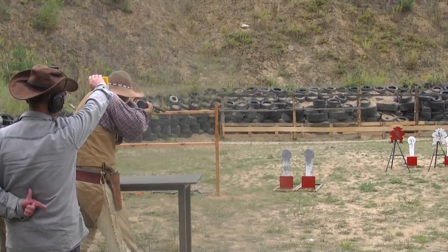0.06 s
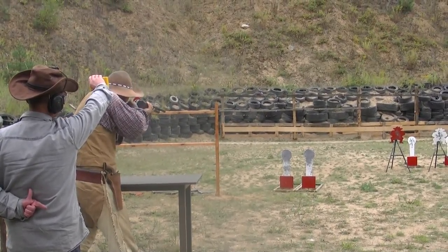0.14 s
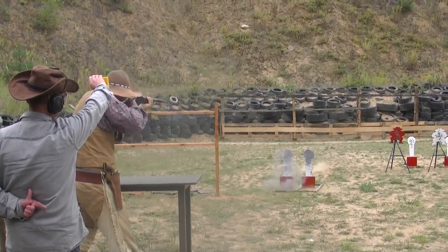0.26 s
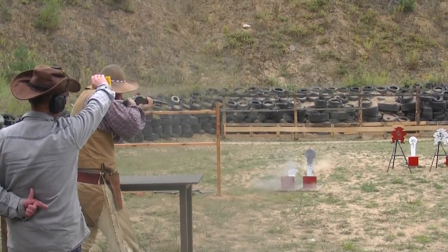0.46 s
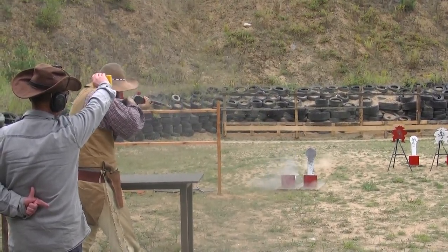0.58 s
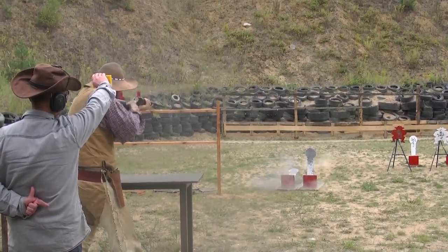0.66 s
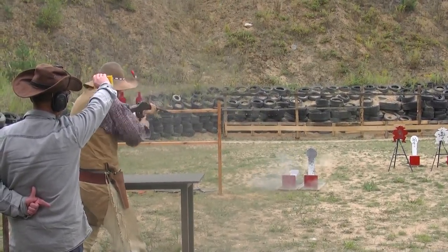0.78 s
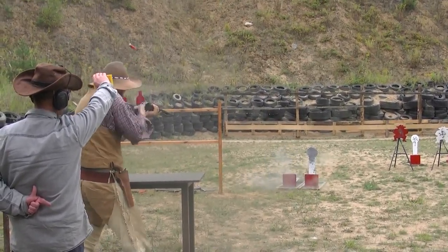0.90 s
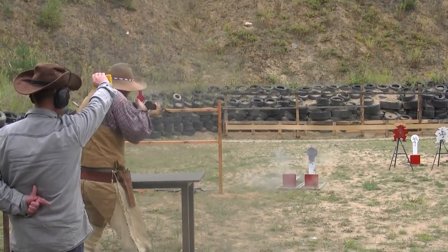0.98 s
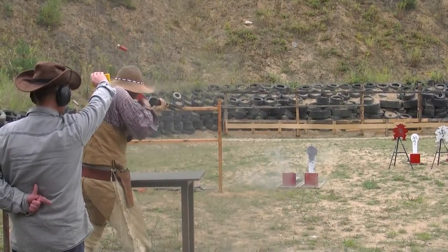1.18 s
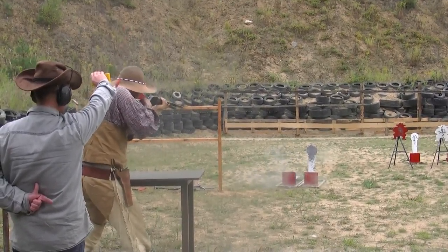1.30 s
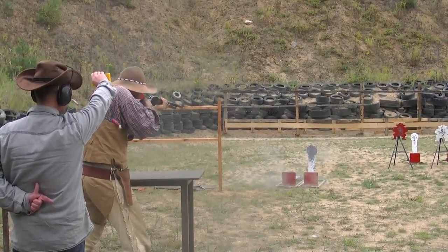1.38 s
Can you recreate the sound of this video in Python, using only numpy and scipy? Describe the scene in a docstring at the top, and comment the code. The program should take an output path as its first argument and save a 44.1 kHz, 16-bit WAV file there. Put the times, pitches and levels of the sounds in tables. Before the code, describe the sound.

A single loud rifle shot, heard from just behind the shooter, echoes and rolls across an outdoor range. The lever then slides open with hollow knocks and clanks shut, followed by a few light knocks and a small click.

```python
"""An outdoor range, just behind the shooter: one rifle shot, while an earlier one dies away.
Hands tap the stock, the hammer falls and the muzzle blast overloads the microphone.
The tyre wall and the earth bank reflect the blast, and the range reverberates in a long roll.
The lever slides open with hollow knocks and clanks shut, each impact exciting modes of the steel;
a few more knocks follow, and a latch clicks."""
import sys
import numpy as np
from scipy import signal
from scipy.fft import rfft, irfft
from scipy.io import wavfile
from scipy.ndimage import uniform_filter1d

SR = 44100
rng = np.random.default_rng(int(sys.argv[2]) if len(sys.argv) > 2 else 0)


def transcribe(signal):
    """Save signal, clipped to [-1, 1], as a 16-bit WAV file at the path in sys.argv[1]."""
    frames = np.atleast_2d(signal).T
    limited = np.clip(frames, -1, 1)
    pcm = np.round(limited * 32767).astype(np.int16)
    wavfile.write(sys.argv[1], SR, pcm)


N = 63945
T, HZ = np.arange(N) / SR, np.fft.rfftfreq(N, 1 / SR)
RIFLE_LOW_HZ = 930  # the rifle radiates little below this

# likeness of the noise at the two microphones (frequency [Hz], correlation [ratio])
COHERENCE = [(40, -0.37), (150, 1), (600, 0.55), (1200, 0.46), (2200, 0.014), (4200, -0.014),
             (8000, -0.043), (13000, 0.35)]
# noise spectra (frequency [Hz], relative spectral density [dB])
EARLIER_SPECTRUM = [(60, -28), (400, -6), (750, 0), (1400, -6.5), (2100, -2), (5000, -16.5), (9000, -23),
                    (15500, -47)]
AIR_SPECTRUM = [(25, -44.5), (284, -11), (1200, -10), (15500, -28)]
TAP_SPECTRUM = [(90, -48), (270, -11.5), (750, 3.5), (2200, 0.5), (4500, -15), (16000, -33.5)]
SNAP_SPECTRUM = [(300, -19), (1000, 0.5), (2000, -1.5), (6000, -5.5), (8000, -1), (11300, 1), (13000, -12),
                 (16000, -20.5)]
BLAST_SPECTRUM = [(15, -50.5), (25, -17), (173, -19.5), (227, -12), (281, -10), (703, -2), (1400, -2),
                  (1750, -4), (4380, -16), (9050, -20), (15500, -26.5)]
ZING_SPECTRUM = [(9300, -43.5), (9420, -5), (9650, -15), (10150, -12), (10400, -47)]
ROLL_SPECTRUM = [(35, -66), (188, -14), (417, -12), (577, -3), (653, -10), (903, -3), (1350, -13.5),
                 (1730, -8), (5860, -20.5), (9650, -22), (15500, -33.5)]
ECHO_SPECTRUM = [(40, -53), (150, -10), (300, -15), (700, 0.5), (1100, -2.5), (3700, -8.5), (7000, -16),
                 (10400, -11.5), (15500, -38)]
SCRAPE_SPECTRUM = [(450, -2.5), (750, 7.5), (1200, 0.5), (2100, 3.5), (3600, -2.5), (6000, -18.5),
                   (8300, -7.5), (13000, -16.5), (16000, -29)]
# time each band takes to fall by 60 dB (frequency [Hz], t60 [s])
EARLIER_DECAY = [(200, 0.35), (2000, 1), (10000, 0.33)]
BLAST_DECAY = [(60, 0.049), (250, 0.52), (1200, 0.35), (5000, .17), (14000, 0.18)]
ROLL_DECAY = [(60, 0.8), (200, 0.77), (2000, 1.29), (6000, 0.77), (14000, 0.33)]
SCRAPE_DECAY = [(1500, 0.23), (10000, 0.18)]
# normal modes of the rifle's parts (frequency [Hz], relative level [dB], t60 [s])
RECEIVER_MODES = [(1349, -13.5, .125), (1407, 7, 0.044), (1534, -17, 0.068), (1840, -12, 0.16),
                  (2096, -10.5, 0.08)]
SMALL_PART_MODES = [(4450, -6, 0.076), (7140, -3, 0.065), (10070, 7.5, 0.02), (11500, -3.5, .05)]
CAVITY_MODES = [(693, -5, 0.19), (724.6, 3.5, 0.14), (784, -7, 0.2), (820, -10.5, 0.19), (945, -5, 0.11),
                (1376, -18, 0.33), (1730, -13, 0.35), (1890, -12.5, 0.15), (2220, -14, 0.15),
                (2540, -20, 0.17), (3620, -20, 0.16)]
STOCK_MODES = [(254, -42, 0.11)]
LATCH_MODES = [(1338, -35, 0.076), (1690, -39, 0.051)]
# taps and scuffs of handling (time [s], level [dB], t60 [s])
HAND_TAPS = [(0.1944, -29.5, 0.19), (.217, -30, 0.14), (.983, -31.5, 0.42)]
# impacts of hammer and lever (time [s], snap level [dB], receiver level [dB], snap t60 [s])
STEEL_IMPACTS = [(0.2333, -19, -11, 0.027), (0.6007, -34, -36, .05), (0.729, -14, -16.5, 0.06),
                 (.747, -22, -41, 0.09), (0.76, -26.5, -28, 0.11), (0.772, -14, -51.5, 0.046),
                 (0.7896, -19.5, -41.5, 0.068), (.883, -34.5, -57, 0.16), (.917, -33.5, -55, 0.089),
                 (0.9237, -19.5, -37, 0.13), (0.932, -43, -24, .04), (0.9474, -18, -39, 0.046),
                 (0.951, -16, -18, 0.066), (.968, -17, -39, 0.076), (0.9726, -13.5, -11.5, 0.04),
                 (1.003, -47, -24.5, .06)]
# returns from the tyre wall and the bank (time [s], level [dB], t60 [s])
REFLECTIONS = [(.344, -13, 0.23), (0.356, -5.5, 0.032), (0.387, -18.5, 0.085)]
# knocks inside the action (time [s], ring level [dB], scrape level [dB])
CAVITY_KNOCKS = [(.601, -26.5, -25), (.678, -21.5, -27.5), (.712, -25.5, -24.5), (.729, -24.5, -25),
                 (1.005, -28.5, -51), (1.070, -40.5, -56), (1.142, -37, -61), (1.159, -25.5, -30)]


def amp(db):
    """The decibel scale: level to amplitude ratio."""
    return 10 ** (np.asarray(db) / 20)


def read(points, hz):
    """Interpolation of a table on a log-frequency axis."""
    frequencies, values = np.transpose(points)
    return np.interp(np.log(hz + 1), np.log(frequencies + 1), values)


def add(mix, start_s, sound):
    """Superposition of a delayed sound on the mix."""
    start = max(round(start_s * SR), 0)
    mix[:, start:] += sound[:, :N - start]


def rise(seconds):
    """Linear onset to full amplitude."""
    return np.minimum(T / seconds, 1)


def fade(t, t60):
    """Exponential damping: 60 dB in t60 seconds."""
    return np.exp(-np.log(1000) * t / t60)


def noise(spectrum, ripple=1):
    """Partial coherence: coloured noise of unit level, partly alike in both microphones."""
    mid, side = rfft(rng.standard_normal((2, N)))
    correlation = np.clip(read(COHERENCE, HZ), -.99, .99)
    mid, side = mid * np.sqrt(1 + correlation), side * np.sqrt(1 - correlation)
    x = irfft(np.array([mid + side, mid - side]) * amp(read(spectrum, HZ)) * ripple, N)
    return x / x.std()


def die_away(x, t60s, hold_s=0):
    """Frequency-dependent damping: after a hold, each band decays at its own rate."""
    hz, t, bands = signal.stft(x, SR, nperseg=512)
    bands = bands * fade(np.maximum(t - hold_s, 0), read(t60s, hz)[:, None])
    return signal.istft(bands, SR, nperseg=512)[1][:, :N]


def ring(modes, uneven_db=0):
    """Free vibration: damped modes reach the two microphones slightly out of phase."""
    out = np.zeros((2, N))
    for hz, db, t60 in modes:
        lead_rad = 0.21 * rng.choice([-1, 1]) * np.array([[1], [-1]])
        strength = amp(db + uneven_db * rng.uniform(-1.2, 1))
        out += strength * fade(T, t60) * np.sin(2 * np.pi * hz * T + lead_rad)
    return out


def unevenness(depth_db, size):
    """Interference of many reflections or resonances, modelled as a smooth random gain."""
    x = uniform_filter1d(uniform_filter1d(rng.standard_normal(N), size), size)
    gain = amp(depth_db * x / x.std())
    return gain / np.sqrt(np.mean(gain ** 2))


def low_cut(x, hz):
    """Radiation efficiency: small objects give out little bass."""
    return signal.sosfilt(signal.butter(2, hz, btype="high", fs=SR, output="sos"), x)


def outdoors(x, wet_db, t60, top_hz=6930):
    """Diffuse scattering from the ground and fences adds a dull tail."""
    tail = rng.standard_normal((2, N)) * fade(T, t60) * rise(0.013)
    tail = signal.lfilter(*signal.butter(1, top_hz, fs=SR), tail / np.linalg.norm(tail[0]))
    return x + amp(wet_db) * signal.fftconvolve(x, tail, axes=1)[:, :N]


def background():
    """Reverberant decay of an earlier shot, over the ambient noise of still air."""
    earlier_shot = die_away(noise(EARLIER_SPECTRUM), EARLIER_DECAY, hold_s=0.0082)
    return amp(-32.5) * earlier_shot + amp(-55) * noise(AIR_SPECTRUM)


def handling():
    """Damped impact: hands on the stock give dull taps that do not ring."""
    out = np.zeros((2, N))
    for start_s, db, t60 in HAND_TAPS:
        add(out, start_s, amp(db) * noise(TAP_SPECTRUM) * fade(T, t60) * rise(0.001))
    return out


def snap(t60, bounce_s, ripple=1):
    """Elastic collision of steel on steel: a contact, one rebound and a brief rattle."""
    contacts = amp(-7) * sum((T >= s) * fade(abs(T - s), .009) for s in (0, bounce_s))
    return low_cut(noise(SNAP_SPECTRUM, ripple) * (fade(T, t60) + contacts), RIFLE_LOW_HZ)


def action():
    """Impact excitation: hammer and lever ring the small parts, and the receiver's clank builds up."""
    out = np.zeros((2, N))
    build_up = rise(0.0045)
    receiver = ring(RECEIVER_MODES) * build_up
    ripple = unevenness(0.5, size=160)[:len(HZ)]  # many small resonances colour the snaps
    for start_s, snap_db, receiver_db, t60 in STEEL_IMPACTS:
        parts = amp(-10) * low_cut(ring(SMALL_PART_MODES, uneven_db=6), RIFLE_LOW_HZ)
        contact = snap(t60, bounce_s=0.0033, ripple=ripple)
        add(out, start_s, amp(snap_db) * (contact + parts) + amp(receiver_db) * receiver)
    add(out, 0.98, ring(STOCK_MODES) * build_up)  # the stock thuds as the lever comes home
    latch_click = amp(-29.5) * snap(t60=0.017, bounce_s=0.0031)
    add(out, 1.3452, latch_click + low_cut(ring(LATCH_MODES), RIFLE_LOW_HZ))
    return outdoors(out, wet_db=-16, t60=0.33)


def muzzle_blast():
    """A pressure pulse scattered by ground and benches, with a bright crack and a thin metallic zing."""
    blast = amp(-7) * die_away(noise(BLAST_SPECTRUM), BLAST_DECAY, hold_s=0.048)
    blast *= unevenness(0.76, size=120)
    crack = amp(-7) * noise(SNAP_SPECTRUM) * fade(T, 0.21)
    zing = amp(-19) * noise(ZING_SPECTRUM) * fade(T, 0.56)
    return (blast + crack + zing) * rise(0.002)


def range_roll():
    """Reverberation of the range: it swells, holds, then dies band by band."""
    roll = amp(-23.5) * die_away(noise(ROLL_SPECTRUM), ROLL_DECAY, hold_s=0.25)
    return roll * unevenness(1.0, size=240) * rise(0.071)


def echoes():
    """Reflection: the tyre wall and the bank return the blast after their travel times."""
    out = np.zeros((2, N))
    for start_s, db, t60 in REFLECTIONS:
        rise_s = 0.057 * t60
        envelope = np.minimum(T / rise_s, fade(abs(T - rise_s), t60))
        add(out, start_s, amp(db) * noise(ECHO_SPECTRUM) * envelope)
    add(out, 0.27, noise(SNAP_SPECTRUM) * fade(T, 0.006))  # a bright slap leads the returns
    return out


def hollow_knocks(detune=0.017):
    """Cavity resonance: the lever unlocks and slides, and loose parts knock in the hollow action."""
    out = lever_slide()
    for start_s, ring_db, scrape_db in CAVITY_KNOCKS:
        # the modes shift a little with the point of contact
        modes = [(hz * (1 + detune * rng.uniform(-0.9, 1)), db, t60) for hz, db, t60 in CAVITY_MODES]
        cavity = ring(modes) * rise(0.0045)
        scrape = die_away(noise(SCRAPE_SPECTRUM), SCRAPE_DECAY)
        add(out, start_s, amp(ring_db) * cavity + amp(scrape_db) * scrape)
    return outdoors(low_cut(out, hz=420), wet_db=-12, t60=0.2)


def lever_slide(start_s=.603, end_s=0.739):
    """Sliding friction: steel rubs on steel, driving the cavity harder as the lever speeds up."""
    progress = (T - start_s) / (end_s - start_s)
    stroke = (progress > 0) * fade(np.maximum(T - end_s, 0), 0.11)
    slips = rng.standard_normal((1, N))
    hum = signal.fftconvolve(slips, ring(CAVITY_MODES), axes=1)[:, :N]
    drive = np.sqrt(np.clip(progress, 0, 1))
    rub = amp(-33) * noise(SCRAPE_SPECTRUM) * unevenness(2.7, size=100)
    return stroke * (rub + amp(-27) * hum / hum.std() * drive)


def scene():
    """Superposition of all sources at the microphones."""
    shot = np.zeros((2, N))
    add(shot, 0.2408, muzzle_blast() + range_roll())
    return shot + echoes() + action() + handling() + hollow_knocks() + background()


def record(dry):
    """Saturation: the microphone rounds off the peaks, and a low-pass filter limits the band."""
    knee, edge_hz = .9, 15750
    excess = np.maximum(abs(dry) - knee, 0)
    rounded = np.clip(dry, -knee, knee) + np.sign(dry) * (1 - knee) * np.tanh(excess / (1 - knee))
    low_pass = signal.firwin(511, edge_hz, window=("kaiser", 7), fs=SR)
    return signal.oaconvolve(rounded, low_pass[None], "same")


dry = scene()
out = record(dry)
transcribe(out)
```